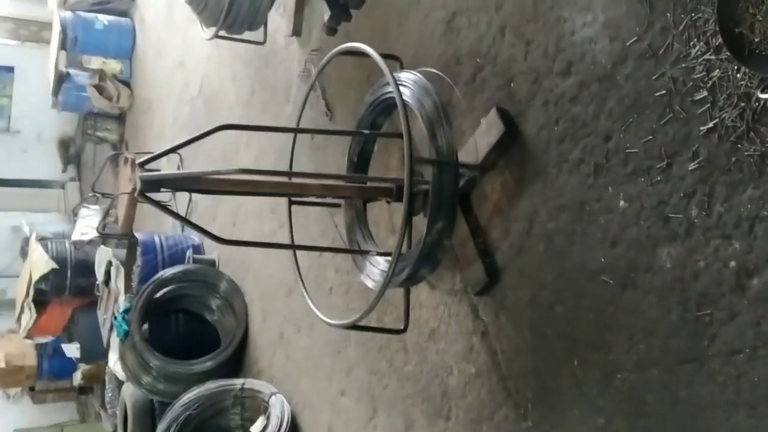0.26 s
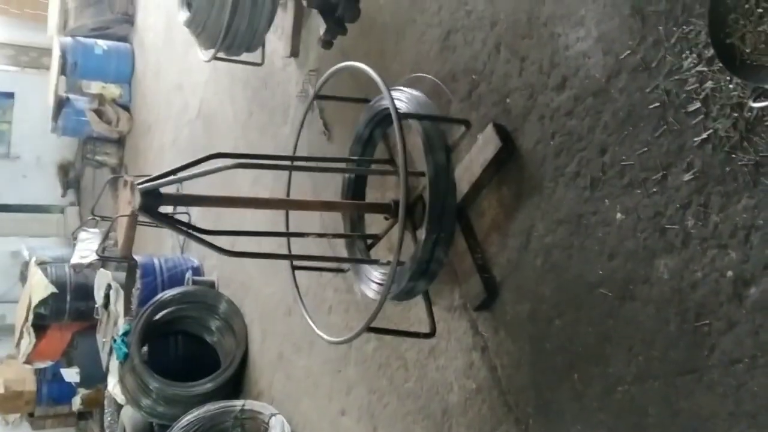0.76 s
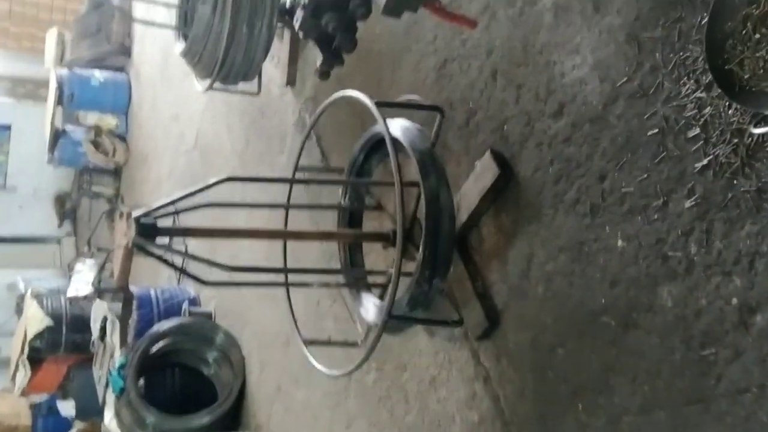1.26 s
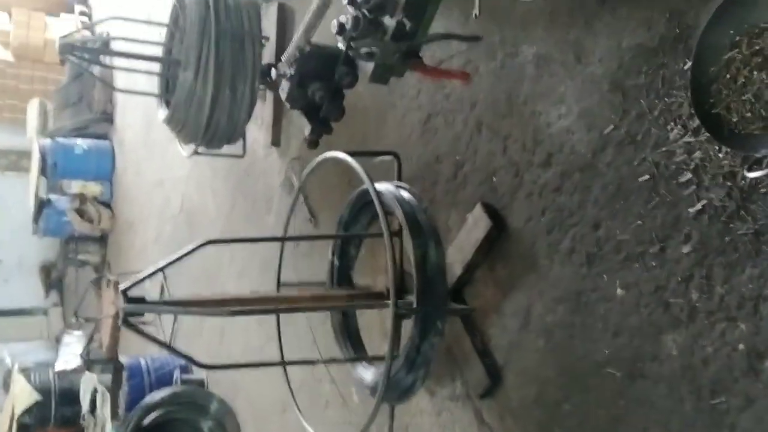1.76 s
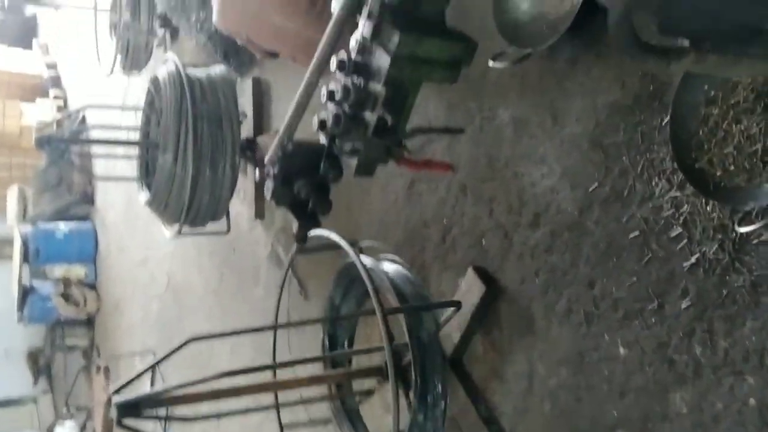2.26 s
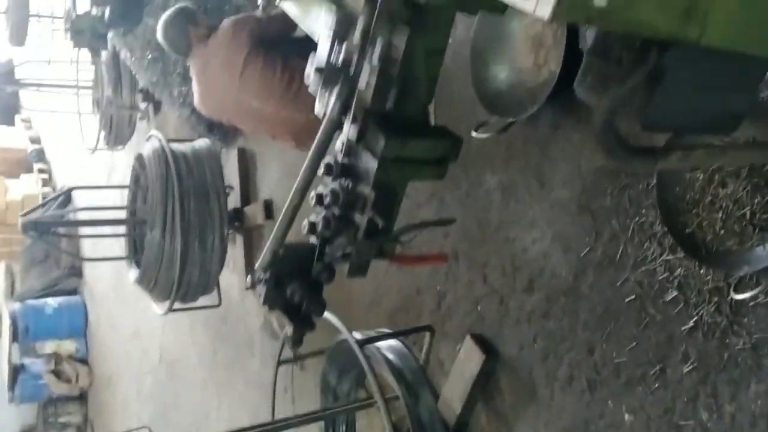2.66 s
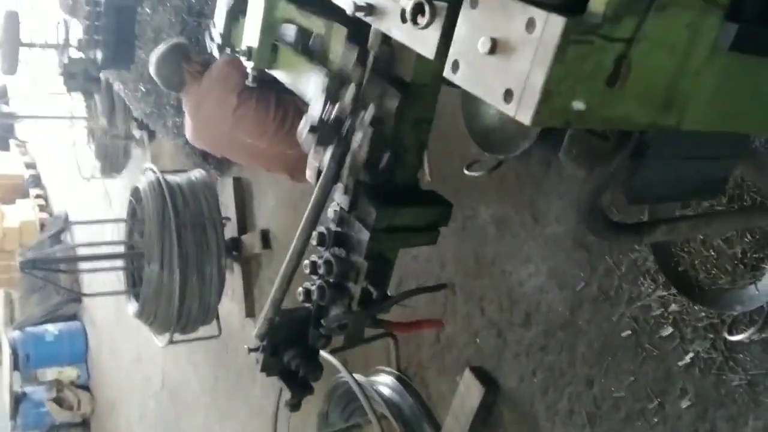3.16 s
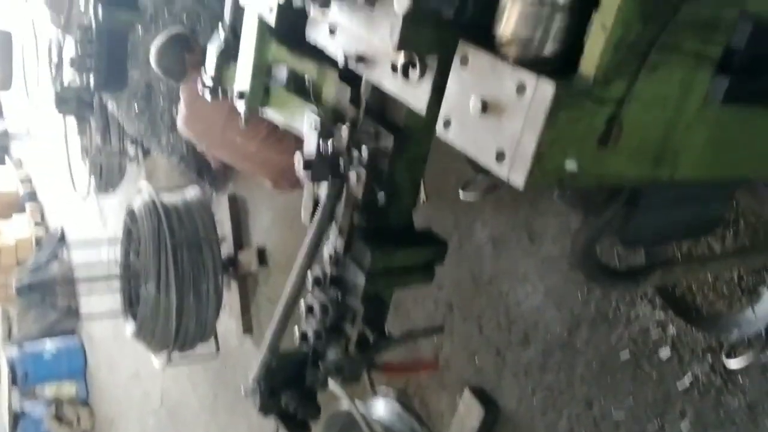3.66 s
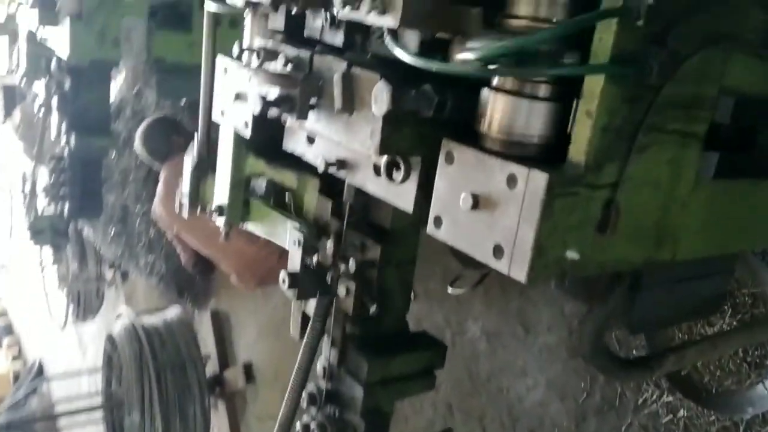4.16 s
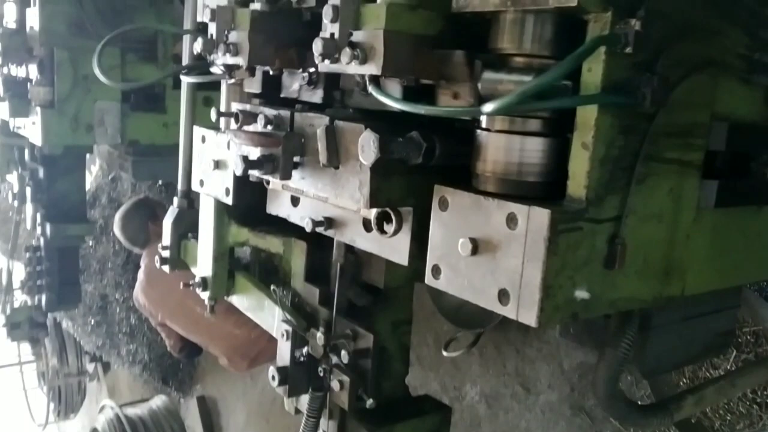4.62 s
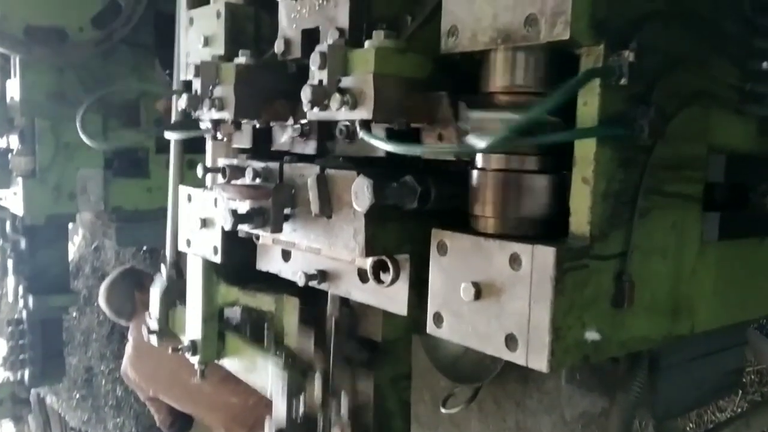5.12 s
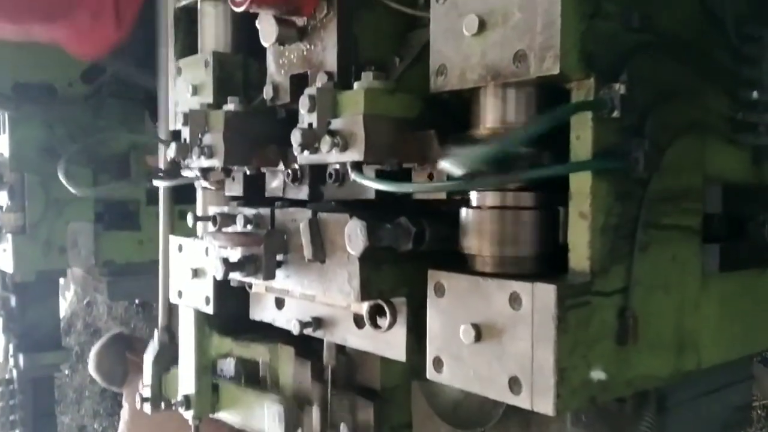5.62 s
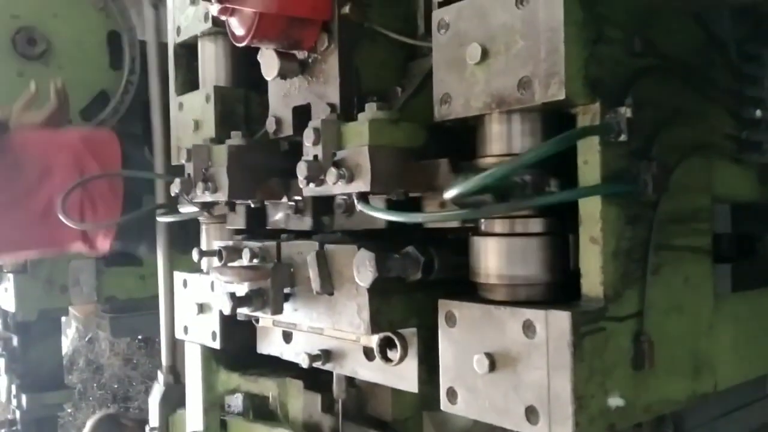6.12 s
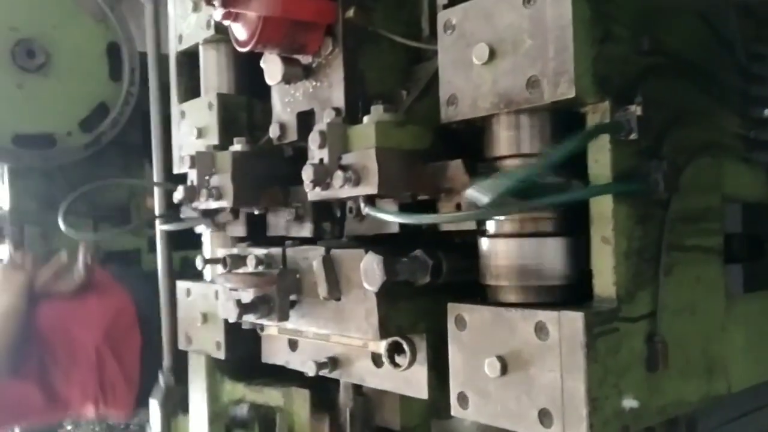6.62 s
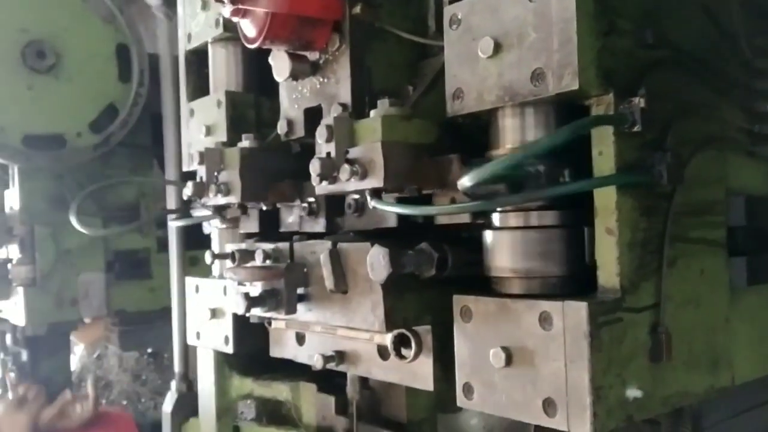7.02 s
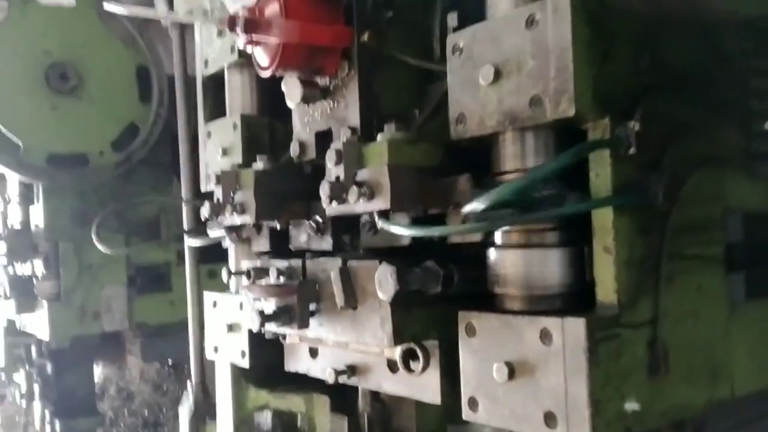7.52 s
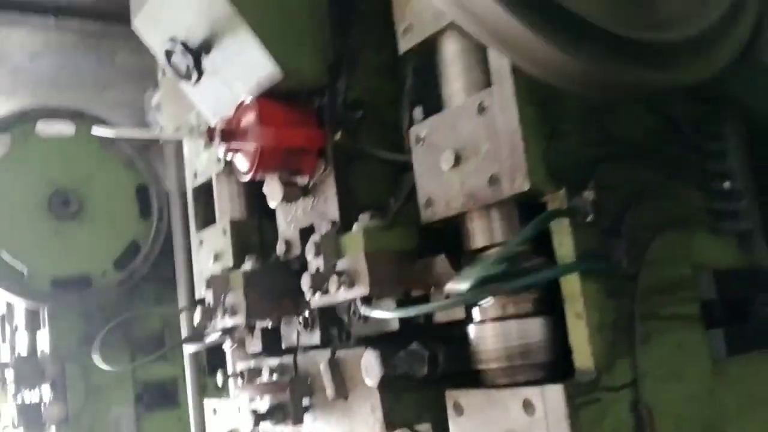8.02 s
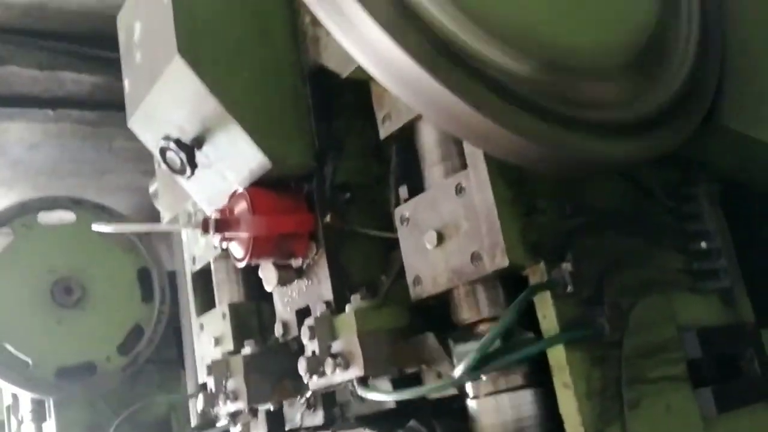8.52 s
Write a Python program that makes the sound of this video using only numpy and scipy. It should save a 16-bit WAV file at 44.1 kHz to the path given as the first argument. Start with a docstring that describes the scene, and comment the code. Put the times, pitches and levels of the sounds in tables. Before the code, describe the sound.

A loud, dense machine clatter runs without pause from beginning to end. Each quick turn gives a knock, clangy ring, loose tooling rattle, wire cutting and a jaw slam, slightly different every time. A few clean snaps stand out. The phone moves along the machine; the hum recedes and the ringing grows stronger after the middle. Hard walls add a short echo, over broad hall roar and tinkling nails.

```python
"""A busy workshop, heard on a hand-held phone close to a wire nail machine that runs at a steady pace.
From the start the hall roars (patchy filtered noise), steel bits tinkle (short decaying sines),
and cams thump the humming base and frame (pulses and noise through resonances).
Each turn the ram heads a nail: a knock, swelling tones and rattle. Then the cutters shear the wire, now
and then with a snap, and the grip dies slam shut: noise bursts through resonances. The walls echo it."""
import sys
import numpy as np
from scipy import signal
from scipy.fft import rfft, irfft, next_fast_len
from scipy.io import wavfile
from scipy.ndimage import uniform_filter1d, minimum_filter1d

SR = 44100
rng = np.random.default_rng(int(sys.argv[2]) if len(sys.argv) > 2 else 0)


def pcm_store(signal):
    """Save signal as 16-bit PCM."""
    levels = np.round(np.clip(np.atleast_2d(signal), -1, 1) * 32767)
    wavfile.write(sys.argv[1], SR, levels.astype(np.int16).T)


N = 387198

# background of other machines: (frequency [Hz], relative level [dB per Hz])
HALL_SPECTRUM = [(35, -56), (70, -44), (100, -16.5), (200, -8), (300, -5.5), (500, -10), (650, -6),
                 (1200, -6), (2000, -13.5), (4300, -10.5), (8000, -16), (10000, -24), (15000, -13.5)]
HALL_DB = -17  # before the overall tone

# nails and offcuts dropping all around
TINKS_PER_S, TINK_HZ, TINK_OCTAVES = 900, 3200, .7  # rate, median pitch, pitch scatter
TINK_T60_CYCLES, TINK_SPREAD_DB, TINK_DB = 44, 2.2, -25.5  # decay, mean extra level, level of all

# cam pushes within a turn: (delay [s], thump in the base [dB], knock in the frame [dB])
CAM_PUSHES = [(0.02, -1, 1.5), (0.049, -12, 2.5), (.06, 4.5, -20), (.074, 2, -14.5), (0.09, 0, -3.5),
              (0.109, -30, -4), (0.136, 3.5, -1), (.155, 0, 1.5), (0.164, -17, -2)]
# resonances of the heavy base: (frequency [Hz], width [Hz], level [dB])
BASE_MODES = [(98, 26, -2.5), (129.3, 32, -4.5)]
# resonances of the frame: (frequency [Hz], width [Hz], level [dB])
FRAME_MODES = [(196, 83, -6.5), (277.2, 23.6, 4), (376, 21, 2), (424, 44, 1.5), (470.5, 14.6, 10),
               (502, 26, 2.5)]
# wavering tones of motor and gears: (frequency [Hz], width [Hz], level [dB])
HUM_MODES = [(265.6, 8.6, -4), (396.4, 9.2, 2), (485, 11, -0.5), (522, 13, 1.5)]
# as the phone moves along the machine:
# (time [s], hum over frame [dB], base over frame [dB], frame [dB], left minus right [dB])
WALK = [(0, -4.5, -11, -27.5, -1), (1.3, -2.5, -8, -27.5, -1), (2.7, -4, -8.5, -28.5, -0.5),
        (4, -4.5, -11, -26.5, -1.5), (5.102, -10, -12.5, -26.5, -0.5), (6.699, -9.5, -11, -27.5, -1),
        (8.78, -15, -13, -27.5, -1)]

FIRST_S, TURN_S = -.0553, .1775  # the first turn is already under way at time zero
# one row per stroke of the ram: (first knock [dB], ring peak delay [s], five ring tones [dB],
# rattle [dB], cutters [dB], cutter brightness [dB], grip [dB], noise burst above 9 kHz [dB])
STROKES = [(-6.0, 0.022, -33, -23, -24, -33, -30, -20, -10.5, -2, -17, -24),
           (15, 0.0088, -28, -23, -30, -26, -23, -16.5, -12, -4, -18.5, -18.5),
           (17, 0.0075, -27, -25, -24, -33, -22.5, -14.5, -10, -1, -17, -25),
           (14, 0.0086, -21, -25, -28, -34, -21, -15.5, -13, -0.5, -19, -37),
           (15, 0.011, -23.5, -23, -25, -34, -24, -13.5, -11.5, -2, -19, -20.0),
           (16, 0.009, -37, -26, -37, -36, -22.5, -18, -8.5, -9, -19, -34),
           (14, 0.011, -23, -23.5, -24, -27, -19, -15, -7.5, -5, -20, -26),
           (13, 0.011, -23.5, -31, -29, -31, -26.0, -16, -12.5, 1.5, -19, -31),
           (9, 0.023, -29, -28, -25, -30, -27, -15.5, -7.5, -4, -19, -46),
           (20, 0.017, -32, -23, -23, -34, -26, -21, -6.5, -3.5, -20.5, -38),
           (7, 0.0089, -35, -25, -22, -28, -18.5, -16.5, -8, -3, -18, -46),
           (16, 0.012, -39, -23, -33, -38, -25.5, -15.5, -15.5, -2, -18.5, -41),
           (21.5, 0.0074, -32, -22.5, -29, -38, -22, -18.5, -13, 4.5, -19.5, -35),
           (17, 0.018, -37, -22, -32, -24, -29, -15.5, -7, -5.5, -20.5, -28.0),
           (8, 0.012, -31, -18.5, -29, -29, -14.5, -14, -3.5, -3, -20, -37),
           (15.5, 0.01, -34, -25, -32, -20, -17.5, -14.5, -4.5, -8, -21.5, -18),
           (7, 0.0077, -36.5, -22, -29, -19, -42, -18.5, -7.5, -2, -18.5, -23),
           (2, 0.013, -22, -14, -28, -21, -14, -19, -8.5, -2, -18.5, -12),
           (8, 0.028, -22, -27, -31, -35, -18.5, -13.5, -11, 3, -19, -16),
           (14, 0.0047, -32, -16.5, -21, -23, -10, -15, -10, -2.5, -21.5, -7),
           (13, 0.015, -24, -20, -16.5, -22.5, -14, -14, -8, -2, -18, -11.5),
           (11, 0.016, -20, -18, -18, -23.5, -12, -13, -10.5, 2, -18.5, -10.5),
           (11, 0.011, -26, -21, -20, -21, -15, -21.5, -9, -6, -18.5, -11),
           (21, 0.022, -15.5, -17, -15, -22, -13.5, -15, -8.5, 0, -20, -8),
           (8, 0.017, -21, -12, -16.5, -20.5, -15.5, -16.5, -8, -1, -21.5, -10),
           (12, 0.0047, -26, -16, -21, -20, -13, -17.5, -9, -1, -22, -23),
           (8, 0.014, -28, -23, -19.5, -27, -23.5, -20.5, -10, 5, -19, -21),
           (7, 0.016, -31, -15, -28, -32, -22, -18, -8, -4, -23.5, -46),
           (-13, 0.0092, -30, -18, -22, -21, -26, -14, -8, -0.5, -18.5, -22),
           (10.5, 0.024, -26, -19, -23, -22.5, -14.5, -16, -9, -4, -21, -28),
           (-13, 0.022, -30, -19.5, -24, -27.5, -15, -17.5, -10.5, 4, -19.5, -16),
           (-2, 0.018, -36, -13.5, -24, -28, -12, -12, -8, -4.5, -18.5, -12),
           (19, 0.022, -28, -18, -35, -25, -24.5, -13.5, -11.5, 5, -20.5, -19),
           (8, 0.025, -28, -14.5, -35, -39, -19.5, -15, -10.5, 1, -21.5, -13),
           (10, 0.02, -29, -17.5, -31, -33, -19.5, -13.5, -7.5, 1, -20.5, -12.5),
           (6, 0.026, -36, -18.5, -35, -23, -21.5, -15.5, -13.5, 7, -20, -39),
           (2, 0.011, -27, -24.5, -31, -22, -26, -16, -7, 0.5, -18.5, -23),
           (6, 0.017, -26, -23, -26, -22, -31, -15.5, -11.5, 0.5, -19, -21),
           (0, 0.0084, -24, -18.5, -33, -30, -21, -9, -6, 3.5, -20, -14),
           (-9, 0.02, -24, -17, -26, -27, -12, -13.5, -9, 1, -18, -8.5),
           (-1, 0.011, -24, -17, -26, -28, -17, -15.5, -7.5, 3.5, -19, -11.5),
           (-12, 0.018, -23, -11, -24, -33, -25, -15.5, -6.5, -5, -19.5, -13),
           (-2, 0.027, -31, -18.5, -33, -25, -29, -14.5, -11, -1, -18.5, -17),
           (2, 0.023, -32, -20, -34, -27.5, -21, -13.5, -8, 0.5, -18, -19),
           (-3, 0.014, -27, -14.5, -27, -28, -19, -14, -12.5, 3, -19.5, -16),
           (-2, 0.017, -30, -17, -24, -34, -24, -14, -13.5, 7.5, -21, -35),
           (0, 0.03, -31.5, -20.5, -29, -33, -15.5, -14, -12, 5, -20, -15),
           (-2, 0.023, -31, -17.5, -30, -40, -30, -15, -9, 0.5, -20, -20),
           (4, 0.022, -27, -23, -30, -27, -21.5, -13.5, -17, 7, -17, -22),
           (-5, 0.02, -34, -19, -35, -31, -24, -14, -13.5, 7.5, -22, -33)]
KNOCK_DB, RING_PEAK_S, *TONES_DB, RATTLE_DB, CUTTER_DB, BRIGHT_DB, GRIP_DB, TREBLE_DB = np.transpose(STROKES)
RISE_S, CONTACT_SCATTER_DB = .003, 1.2  # build-up of a contact, and how unequally contacts land

# rebounds of the ram on the die: (delay [s], strength [dB], t60 of the chatter [s])
REBOUNDS = [(0, 9, 0.21), (.01, 10, 0.24), (0.018, 9.5, .07), (0.03, 10, 0.048)]
# tones of ram (first three) and die (last two) under the heading pressure: frequency [Hz]
RING_HZ = [742.6, 812.4, 871, 1031.3, 1220]
RING_DB, RING_SWELL = 4.5, 0.64  # added to the tone levels; exponent that shapes the swell
RING_JOLT, RING_DETUNE = .004, .003  # phase wander [radians a sample], relative pitch scatter
RING_SIDE_DB = -4.5  # the tones reach both channels more alike than the chatter does
BUZZ_RAM_DB, BUZZ_DIE_DB = -14, -11  # chatter, added to the strongest tone's tabled level
# resonances of the ram: (frequency [Hz], width [Hz], level [dB])
RAM_MODES = [(740, 28, -6), (815, 51, 5), (889, 32, 0.5), (920, 200, 2)]
# resonances of the die: (frequency [Hz], width [Hz], level [dB])
DIE_MODES = [(1049, 21, -3), (1174, 69, -1), (1210, 25, 1), (1620, 1900, -16)]
# the ring is choked as the ram backs off: (delay [s], gain [dB])
RELEASE = [(0, 1.5), (.042, -2), (.056, -17.5), (.072, -40), (.17, -30)]
# heading contacts within a turn: (delay [s], strength [dB], t60 of the chatter [s])
HEADING = [(0, 0.5, 0.17), (.01, 1, 0.16), (0.025, -1.5, 0.086), (0.035, -2, 0.074), (.044, -9, 0.045)]
# resonances of the rattling tooling: (frequency [Hz], width [Hz], level [dB])
TOOLING_MODES = [(1520, 142, 1.5), (2330, 750, -6.5), (2720, 51, 2.5), (3290, 260, 5), (4377, 108, 4),
                 (4950, 126, 1), (5410, 37, 3), (6393, 91, 5), (7790, 60, 2)]
# bands of the noise burst heard above 9 kHz with each stroke: (frequency [Hz], width [Hz], level [dB])
TREBLE_MODES = [(9600, 250, 18.5), (13800, 690, 9.5)]

# shearing contacts within a turn: (delay [s], strength [dB], t60 of the chatter [s])
SHEARING = [(0.087, 0, 0.052), (0.097, 0, 0.075), (.106, -11, 0.11)]
# resonances of the cutter blades: (frequency [Hz], width [Hz], level [dB])
BLADE_MODES = [(2660, 4500, 1.6), (4270, 830, 11.95), (5570, 310, 7.9), (6600, 400, 10.2), (7960, 260, 1.7)]
BRIGHT_HZ = 5100  # blade resonances above this follow the brightness column
# grip die contacts within a turn: (delay [s], strength [dB], t60 of the chatter [s])
GRIPPING = [(.088, -2, 0.23), (0.101, 1.5, 0.14), (0.111, 6, 0.059), (0.159, 1, 0.35)]
# resonances of the grip jaws: (frequency [Hz], width [Hz], level [dB])
JAW_MODES = [(523, 12.6, 6), (826, 103, 5), (1046, 184, -3), (1238, 36, 4), (1537, 30, 7), (1688, 145, 0),
             (2380, 230, -12)]
# the block under the ram's first knock: (frequency [Hz], width [Hz], level [dB])
BLOCK_MODES = [(820, 240, 0), (1060, 330, 3), (735, 90, -3), (1600, 550, -6)]
# the wire parts with a clean snap: (time [s], relative level [dB])
SNAPS = [(0.5646, -16), (1.9954, -10), (2.163, -9), (2.173, -10), (2.34, -7), (7.8443, -8)]
SNAP_DB, SNAP_T60_S = 3.5, 0.021  # added to every snap; decay

# wall echo: (frequency [Hz], t60 [s])
ECHO_T60 = [(200, 0.48), (1000, 0.29), (8000, 0.083)]
# tone of the middle (mid) part, nearly empty around 3.5 kHz: (frequency [Hz], gain [dB])
MID_TONE = [(2000, 1), (2500, -2.5), (2900, -5.5), (3200, -9), (3330, -20), (3420, -32.5), (3480, -77),
            (3690, -71), (3750, -29), (3850, -7), (4150, 0)]
# tone of the side part, in which left and right differ: (frequency [Hz], gain [dB])
SIDE_TONE = [(25, 1), (60, -18), (200, -15.5), (500, -7.5), (800, -2), (1800, 0.5), (3000, 1), (4500, -0.5),
             (7000, 0)]
# overall tone, with very little between about 8.2 and 10 kHz: (frequency [Hz], gain [dB])
OVERALL_TONE = [(30, -6.5), (60, -17), (85, -2), (7900, -3), (8150, -14), (8400, -66), (9400, -45),
                (10500, -21), (15000, -38)]
# balance of the two channels: (frequency [Hz], left minus right [dB])
TILT = [(60, -1), (150, 2), (380, 0.5), (950, 1), (2370, 0), (3600, 0), (5940, 0), (14900, 1.5)]
TOP_HZ = 15504  # the band ends here


def amp(db):
    """Decibels to amplitude."""
    return 10 ** (np.asarray(db) / 20)


def unit(x):
    """x scaled to an RMS of one."""
    return x / np.sqrt(np.mean(x ** 2) + 1e-20)


def along(points, hz):
    """Interpolate (frequency [Hz], value) points on a log frequency axis."""
    f, value = np.transpose(points)
    return np.interp(np.log(hz + 1), np.log(f + 1), value)


def filtered(x, response):
    """x times a complex response of frequency."""
    m = next_fast_len(N + SR // 2)
    spectrum = rfft(np.float32(x), m)
    return irfft(spectrum * response(np.fft.rfftfreq(m, 1 / SR)), m)[..., :N]


def resonance(f, center, width):
    """Response of one damped resonance, one at its center."""
    return 1j * f * width / (center * center - f * f + 1j * f * width)


def ringing(x, modes):
    """x through resonances of alternating sign, scaled so that white noise keeps its power."""
    def body(f):
        return sum((-1) ** k * amp(db) * resonance(f, c, w) for k, (c, w, db) in enumerate(modes))
    power = np.mean(np.abs(body(np.linspace(0, SR / 2, num=4096))) ** 2)
    return filtered(x, body) / np.sqrt(power)


def turns():
    """Start time of every turn of the shaft, in seconds."""
    return FIRST_S + TURN_S * np.arange(len(STROKES))


def shifting(x, modes, vary_db, drift, lean_db=0):
    """Like ringing, but each resonance changes in strength and slightly in pitch from turn to turn."""
    span = round(TURN_S * SR)
    c, w, db = np.transpose(modes)
    luck = rng.standard_normal((len(STROKES), len(modes), 2))
    gains = amp(db + lean_db + vary_db * luck[..., 0])
    hz = c * (1 + drift * luck[..., 1])
    # cut x into turns, filter each, and let the tails overlap
    starts = np.round(turns() * SR).astype(int) + span
    pieces = np.pad(x, ((0, 0), (span, span)))[:, starts[:, None] + np.arange(span)]
    m = next_fast_len(2 * span)
    f = np.fft.rfftfreq(m, 1 / SR)
    body = sum((-1) ** k * gains[:, k, None] * resonance(f, hz[:, k, None], w[k])
               for k in range(len(modes)))
    rung = irfft(rfft(pieces, m) * body, m).transpose(1, 0, 2)
    out = np.zeros((2, N + 4 * span))
    for start, piece in zip(starts, rung):
        out[:, start:start + m] += piece
    return out[:, span:span + N] / np.sqrt(np.sum(amp(db) ** 2 * w * np.pi / SR))


def strength(turn_db, contacts):
    """Force envelope: every contact of every turn builds up quickly and dies away; powers add."""
    t = np.arange(SR // 4) / SR
    shapes = np.array([amp(level - 60 * (t - delay) / t60) ** 2 * np.clip((t - delay) / RISE_S, 0, 1)
                       for delay, level, t60 in contacts])
    scatter_db = CONTACT_SCATTER_DB * rng.standard_normal((len(STROKES), len(contacts)))
    forces = amp(turn_db[:, None] + scatter_db)
    power = np.zeros(N + SR)  # a quarter second of lead-in, cut off below
    for s, force in zip(turns(), forces):
        power[round(s * SR) + SR // 4:][:len(t)] += force ** 2 @ shapes
    return np.sqrt(power[SR // 4:][:N])


def chatter(grain_db):
    """Loose steel parts tick against each other: noise whose samples have very uneven size."""
    grain = amp(grain_db * rng.standard_normal(N))
    return unit(rng.standard_normal((2, N)) * grain)


def walk():
    """Every level column of the walk, in dB, interpolated at each sample."""
    s, *columns = np.transpose(WALK)
    return [np.interp(np.arange(N) / SR, s, column) for column in columns]


def hall():
    """Other machines blur into a roar: noise made patchy over time and frequency, then coloured."""
    z = signal.stft(rng.standard_normal((2, N)), nperseg=512)[2]
    patches = uniform_filter1d(rng.standard_normal(z.shape[1:]), 5, 0)
    patches = uniform_filter1d(patches, 8, 1)
    roar = signal.istft(z * amp(1.55 * unit(patches)), nperseg=512)[1][:, :N]
    return amp(HALL_DB) * unit(filtered(roar, lambda hz: amp(along(HALL_SPECTRUM, hz))))


def tinks():
    """Small steel bits land at random moments, each a briefly ringing, decaying sine."""
    count, t = round(TINKS_PER_S * N / SR), np.arange(SR // 60) / SR
    luck, spot = rng.standard_normal((count, 2)), rng.random((count, 2))
    hz = np.clip(TINK_HZ * 2 ** (TINK_OCTAVES * luck[:, :1]), 1200, 8000)
    level_db = -TINK_SPREAD_DB * np.log(spot[:, :1])  # a few land much harder
    grains = amp(level_db - 60 * t * hz / TINK_T60_CYCLES) * np.sin(2 * np.pi * hz * t)
    at = (spot[:, 1:] * N).astype(int) + np.arange(len(t))
    side_sign = np.sign(luck[:, 1:])  # scatters the bits to either side
    pair = [np.bincount(at.ravel(), (grains * sign).ravel())[:N] for sign in (1, side_sign)]
    return amp(TINK_DB) * unit(np.array(pair))


def frame():
    """Cams push the heavy base and frame in nearly the same way every turn, over a motor hum."""
    delay, thump_db, knock_db = np.transpose(CAM_PUSHES)
    at = turns()[:, None] + delay + .25  # a quarter second of lead-in, cut off below
    luck = rng.standard_normal((*at.shape, 3))
    at = np.round((at + 0.00095 * luck[..., 0]) * SR).astype(int)
    parts = []
    for db, modes, grind_db in ((thump_db, BASE_MODES, -12), (knock_db, FRAME_MODES, -3)):
        pushes = np.zeros((2, N + SR))
        pushes[0, at] = amp(db + 1.3 * luck[..., 1])
        pushes[1, at] = amp(db) * luck[..., 2]
        grind = amp(grind_db) * rng.standard_normal((2, N))  # gears and bearings keep it humming
        drive = unit(pushes[:, SR // 4:][:, :N]) + grind
        parts.append(unit(shifting(drive, modes, vary_db=1.66, drift=0.0078)))
    base, knocks = parts
    hum = unit(shifting(rng.standard_normal((2, N)), HUM_MODES, vary_db=3.5, drift=0.023))
    hum_db, base_db, frame_db, _ = walk()
    return amp(frame_db) * (amp(base_db) * base + knocks + amp(hum_db) * hum)


def ring():
    """Each stroke swells five tones of ram and die; the rebounds jolt their phase."""
    t, out = np.arange(SR // 8) / SR, np.zeros((2, N + SR))
    for s, peak_s, tones_db in zip(turns(), RING_PEAK_S, np.transpose(TONES_DB)):
        detune = 1 + RING_DETUNE * rng.standard_normal(len(RING_HZ))
        hz = np.multiply(RING_HZ, detune)[:, None]
        jolt = np.cumsum(RING_JOLT * rng.standard_normal((len(hz), len(t))), axis=1)
        phase = 2 * np.pi * (hz * t + rng.random((2, len(hz), 1))) + jolt
        swell = (t / peak_s * np.exp(1 - t / peak_s)) ** RING_SWELL
        tones = amp(tones_db + RING_DB) @ np.sin(phase)
        out[:, round(s * SR) + SR // 4:][:, :len(t)] += swell * tones
    return out[:, SR // 4:][:, :N] * amp([[0], [RING_SIDE_DB]])


def choke():
    """Gain of the ringing through each turn, as the ram backs off."""
    s, t = turns(), np.arange(N) / SR
    since_start = t - s[np.searchsorted(s, t) - 1]
    return amp(np.interp(since_start, *np.transpose(RELEASE)))


def heading():
    """The ram presses the nail head: choked ringing and buzz of ram and die, and tooling rattle."""
    ram_db = np.max(TONES_DB[:3], axis=0) + BUZZ_RAM_DB
    die_db = np.max(TONES_DB[3:], axis=0) + BUZZ_DIE_DB
    ram = ringing(strength(ram_db, REBOUNDS) * chatter(grain_db=4.5), RAM_MODES)
    die = ringing(strength(die_db, REBOUNDS) * chatter(grain_db=1.0), DIE_MODES)
    rattle = strength(RATTLE_DB, HEADING) * chatter(grain_db=4.5)
    rattle = shifting(rattle, TOOLING_MODES, vary_db=2.5, drift=.025)
    return choke() * (ring() + ram + die) + rattle


def treble_bursts():
    """Bursts of noise above 9 kHz that keep time with the strokes, stronger on some than others."""
    return ringing(strength(TREBLE_DB, HEADING) * chatter(grain_db=3.0), TREBLE_MODES)


def shearing():
    """The cutters shear the wire: chatter in the blades, brighter on some turns."""
    upper = np.transpose(BLADE_MODES)[0] > BRIGHT_HZ
    burst = strength(CUTTER_DB, SHEARING) * chatter(grain_db=3.0)
    return shifting(burst, BLADE_MODES, vary_db=2.0, drift=0.016, lean_db=np.outer(BRIGHT_DB, upper))


def gripping():
    """The grip dies slam shut: chatter in the resonances of the jaws."""
    burst = strength(GRIP_DB, GRIPPING) * chatter(grain_db=5.0)
    return shifting(burst, JAW_MODES, vary_db=2.0, drift=0.01)


def blows():
    """The ram's first contact is one hard knock through the whole block."""
    knocks = np.zeros(N)
    # the first turn began before time zero
    knocks[np.round(turns()[1:] * SR).astype(int)] = amp(KNOCK_DB[1:])
    contact = np.hanning(round(.0009 * SR))  # the wire cushions the blow
    knocks = np.convolve(knocks, contact / contact.sum())[:N]
    return ringing(knocks, BLOCK_MODES) * [[1], [-.3]]


def snaps():
    """The parting wire sends a short crack of decaying noise into the blades."""
    t, out = np.arange(SR // 50) / SR, np.zeros((2, N))
    for s, db in SNAPS:
        crack = amp(db + SNAP_DB - 60 * t / SNAP_T60_S) * rng.standard_normal((2, len(t)))
        out[:, round(s * SR):][:, :len(t)] += crack
    return ringing(out, BLADE_MODES)


def echo(x):
    """The walls answer with a noise tail in which each frequency dies at its own speed."""
    hz, t, z = signal.stft(rng.standard_normal((2, SR // 2)), SR, nperseg=256)
    decay = amp(-60 * t / along(ECHO_T60, hz)[:, None])
    tail = signal.istft(z * decay, SR, nperseg=256)[1]
    return signal.fftconvolve(x, tail / np.linalg.norm(tail[0]), axes=1)[:, :N]


def scene():
    """Two-channel layers become the middle and side parts, each with its own tone, then left and right."""
    near = heading() + treble_bursts() + shearing() + gripping() + blows() + snaps()
    layers = near + amp(-13.0) * echo(near) + frame() + hall() + tinks()
    mid, side = filtered(layers, lambda hz: amp([along(MID_TONE, hz), along(SIDE_TONE, hz)]))
    pan_db = walk()[-1] / 2
    return mid * amp([pan_db, -pan_db]) + [side, -side]


def record(dry):
    """The overall tone and balance are set; a limiter holds the peaks down; the band ends."""
    def tone(hz):
        return amp(along(OVERALL_TONE, hz) + np.outer([.5, -.5], along(TILT, hz)))
    x = filtered(dry, tone)
    reach = round(.003 * SR)
    needed = np.minimum(1, .85 / (np.abs(x).max(axis=0) + 1e-9))  # gain that keeps peaks under .85
    x = x * uniform_filter1d(minimum_filter1d(needed, 2 * reach), reach)
    return filtered(x, lambda hz: hz < TOP_HZ)


dry = scene()
out = record(dry)
pcm_store(out)
```